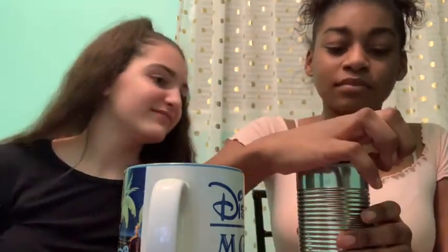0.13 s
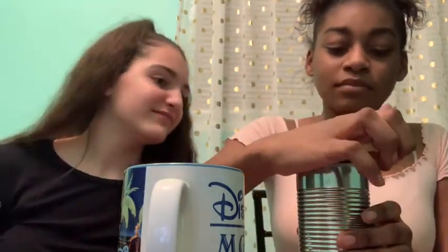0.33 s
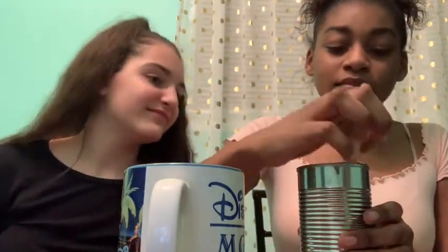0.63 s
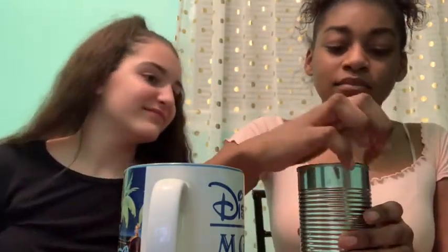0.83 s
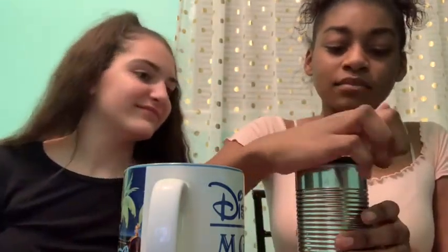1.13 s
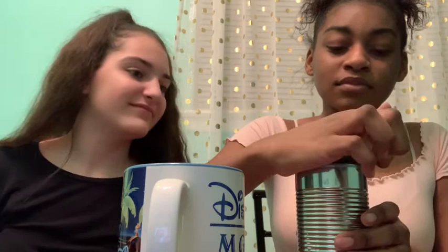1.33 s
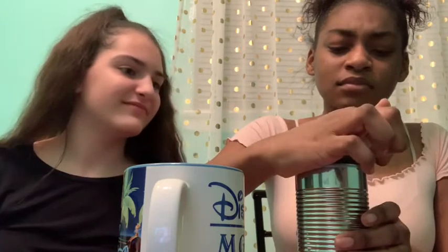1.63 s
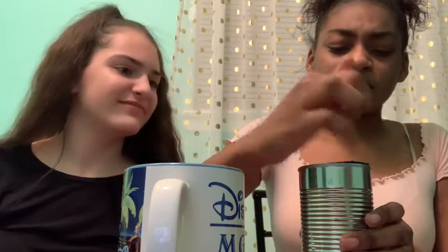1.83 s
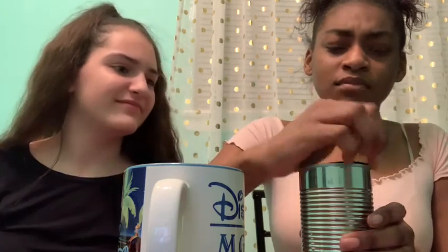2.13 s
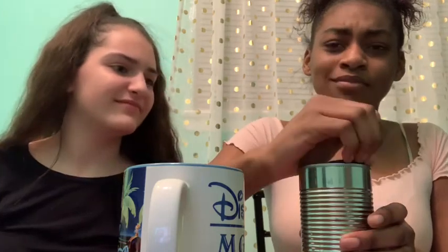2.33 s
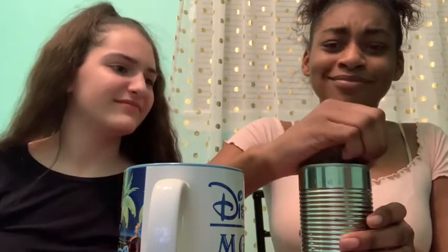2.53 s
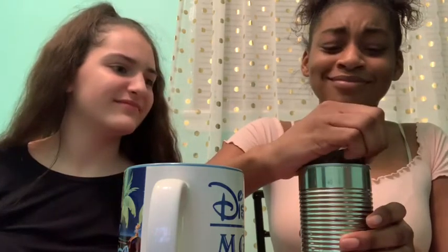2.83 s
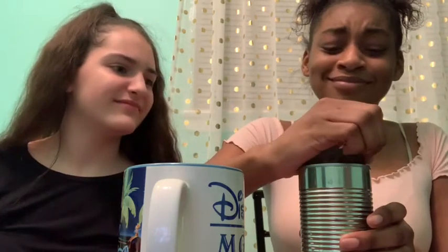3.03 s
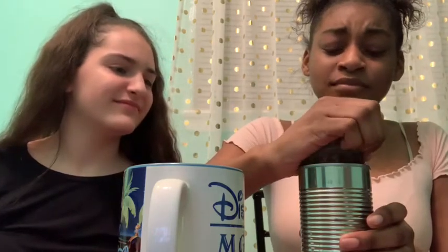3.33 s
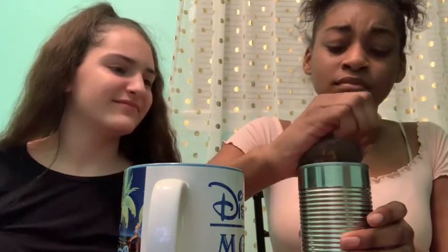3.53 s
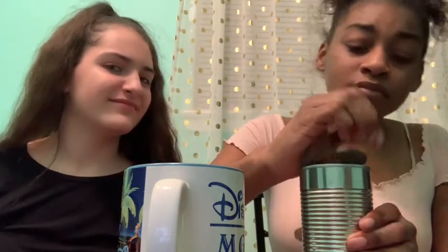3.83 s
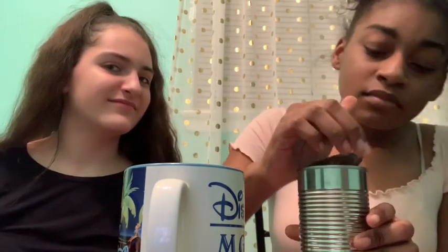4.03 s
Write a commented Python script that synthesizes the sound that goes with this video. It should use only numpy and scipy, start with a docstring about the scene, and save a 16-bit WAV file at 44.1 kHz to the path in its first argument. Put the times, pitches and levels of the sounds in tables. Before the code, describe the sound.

In a quiet small room, two hard metallic snaps, faint fingernail ticks, and finally a hollow pop with a short tearing rim and small bumps.

```python
"""A pull ring on a steel can is levered up and snaps twice against the lid; nails tick and scrape,
then the lid gives with a hollow pop and its rim tears while the can bumps on the table, in a quiet small room.
Snaps pass through a flexing lid into a ringing wall; knocks and chinks are damped modes; scrapes, rubs and
tears are runs of tiny slips or cracks. Two microphones hear it, the can a little to their right."""
import sys
import numpy as np
from scipy import signal
from scipy.fft import rfft, irfft, next_fast_len
from scipy.io import wavfile

SR = 44100
rng = np.random.default_rng(int(sys.argv[2]) if len(sys.argv) > 2 else 0)


def put_to_file(sound):
    """Save the sound as 16-bit audio at rate SR, in the file named by the first command-line argument."""
    columns = np.atleast_2d(sound).T  # one column per channel
    safe = np.clip(columns, -1, 1)
    whole_steps = np.round(safe * 32767)
    wavfile.write(sys.argv[1], SR, whole_steps.astype(np.int16))


N = 184029

# The quiet room's spectrum, its overall level set by HUSH_DB. Each row: frequency in Hz, relative density in dB.
HUSH_SPECTRUM = [(15, -34.5), (25, 3), (62, -6.5), (86, -19.5), (107, -13), (173, -14), (331, -24),
                 (445, -26.5), (614, -30.5), (1620, -37), (2170, -41.5), (8130, -44.5), (11200, -47),
                 (12500, -48.5), (15500, -49.5)]
HUSH_DB = -65.5  # rms of the two channels' average

# The ring snaps on the lid, which is stiffer once the ring is raised. Each row: start in seconds, level in dB,
# tilt in dB per octave, the lid's main flex in Hz, its lift in dB, pitch factor on the other lid modes,
# lag of the ring's rebound in seconds.
RING_SNAPS = [(0.4005, 7.5, -1.32, 1990, 0, 0.96, 0.0032), (1.7513, 11, -0.38, 2270, 5, 0.94, 0.0022)]
# Colour of the ring's contact. Each row: frequency in Hz, level in dB.
SNAP_COLOUR = [(40, -15), (230, -5), (550, -9), (800, -10.5), (1100, -12.5), (1650, -3.5), (2100, 1),
               (2500, 0), (2950, -3.5), (3500, -3.5), (4600, -12.5), (5800, -15.5), (7400, -19.5),
               (9000, -20.5), (11400, -25), (13000, -19), (15000, -20)]
# The lid's other quickly damped modes, at pitch factor 1. Each row: frequency in Hz, lift in dB, t60 in seconds.
LID_MODES = [(580, -2.5, 0.025), (850, -4.5, 0.018), (1490, -4, 0.017), (1790, -2, 0.012),
             (2768, -2, 0.015), (3220, -2, 0.012), (3540, -3, 0.006), (4110, -1, 0.013), (4880, -1, 0.0057),
             (6380, 4, 0.0073), (9500, -1.5, 0.0056), (14500, 3.5, 0.012)]
# The ribbed steel wall's clusters of close modes. Each row: centre in Hz, spread to either side in Hz,
# lift in dB, t60 in seconds.
WALL_CLUSTERS = [(1475, 90, -8.5, 0.4), (1750, 140, -8, 0.26), (2047, 160, -9, 0.23), (2317, 150, -9, 0.19),
                 (2753, 190, -9, 0.2), (3160, 130, -8.5, 0.22), (3624, 280, -7, 0.3),
                 (6200, 250, -10, 0.14), (7800, 23, -8.5, 0.27), (14900, 250, -4, 0.11)]
FLEX_T60_S = 0.007  # the lid's main flex dies quickly
GRIND_S, GRIND_DB = 0.009, -9  # the ring grinds before it lets go; level against the snap
REBOUND_DB = -11.5  # against the first contact

# Colour of the can's push on the table, before its pitch shift. Each row: frequency in Hz, level in dB.
THUD_COLOUR = [(20, -15), (40, -6), (60, -7.5), (95, -10.5), (135, 0.5), (190, 0.5), (270, -5.5),
               (420, -19), (800, -15), (3000, -62)]
# The table top's modes. Each row: frequency in Hz, relative level in dB, t60 in seconds.
TABLE_MODES = [(37, -5.5, 0.33), (70, -7.5, 0.14), (117.7, 3.5, 0.14), (144, 4.5, 0.02), (208.5, -1, 0.25),
               (255, 0.5, 0.16), (338, 0, 0.017)]
THUD_LAG_S = 0.0043  # the table takes each snap's push a little later

# Fingernail and ring ticks. Each row: start in seconds, level in dB, tilt in dB per octave,
# chink of the loose ring in dB.
NAIL_TICKS = [(0.805, -34, -5, -59), (1.067, -36, -6, -53), (1.081, -41, -8, -55), (1.091, -46, -6, -57),
              (2.238, -32.5, -0.5, -40.5), (2.249, -20.5, -2, -43), (2.284, -30.5, -6.5, -48),
              (2.389, -46, -6, -58), (2.481, -32.5, 2, -58), (2.49, -26, -0.5, -51), (2.505, -27, -2, -50),
              (2.578, -22.5, 0, -53), (3.075, -35.5, -3.5, -49.5), (3.096, -41.5, -3.5, -53.5),
              (3.131, -40.5, -3.5, -58), (3.506, -42.5, -3.5, -59), (3.807, -8.5, -5, -48),
              (3.811, -8, -3.5, -48), (3.8331, -12.5, -0.5, -28), (4.082, -26.5, 2, -25),
              (4.103, -22.5, -1, -30)]
# Strokes of the hand; each scrapes the steel and shifts the can. Each row: start in seconds, length in seconds,
# scrape drive in dB rms, scrape tilt in dB per octave, central pitch of the rubbed steel in Hz,
# rub drive in dB rms, central pitch of the rubbed body in Hz.
HAND_STROKES = [(0.995, 0.053, -86, 3, 2440, -72, 710), (1.061, 0.039, -68, -6.5, 2090, -76.5, 330),
                (2.173, 0.11, -75, -6, 2300, -70, 392), (2.237, 0.11, -65, 4, 1726, -62.5, 528),
                (2.319, 0.057, -71, -5, 1730, -66, 542), (2.478, 0.046, -61, 1.5, 2900, -60.5, 538),
                (2.573, 0.039, -71, -6.5, 1910, -50.5, 250), (2.662, 0.1, -73.5, -12.5, 1750, -76, 820),
                (3.795, 0.026, -60, -4, 2390, -56, 790), (3.833, 0.092, -81, 0, 2400, -46.5, 270),
                (3.946, 0.045, -73, -11, 3550, -58, 850), (4.067, 0.066, -59.5, 2, 3090, -52.5, 540)]
# Colour of the nails' contact. Each row: frequency in Hz, level in dB.
NAIL_COLOUR = [(100, 8.5), (600, -6), (1150, -13.5), (1800, 7), (2400, 8), (3200, 2), (4800, -11.5),
               (6200, -13.5), (9500, -14.5), (12500, -18), (14500, -20), (15800, -30)]
# The pull ring's chink. Each row: frequency in Hz, relative level in dB, t60 in seconds.
RING_MODES = [(1730, -7.5, 0.13), (2350, -6, 0.11), (2430, 4.5, 0.13), (2900, -3, 0.079), (3125, 4, 0.066),
              (3140, 2.5, 0.073), (3330, 1, 0.08), (3690, -6, 0.08)]
# Colour of the can shifting under the hand. Each row: frequency in Hz, level in dB.
RUB_COLOUR = [(30, 9.5), (95, -9), (150, 0), (240, 4.5), (380, -7), (550, -6), (900, -17.5), (1300, -24.5),
              (2500, -46), (8000, -51)]
CLUMP_S = 0.011  # slips and cracks bunch together over about this time

# Hollow knocks of lid and can. Each row: start in seconds, body level in dB, tilt in dB per octave,
# pitch factor on the body modes, drive of table and base in dB.
CAN_KNOCKS = [(1.077, -46, -7, 0.59, -37.5), (1.8083, -0.5, -2.5, 0.97, -2.5), (2.249, -30, -5, 0.8, -36.5),
              (2.266, -32, -8, 0.67, -30.5), (2.284, -35.5, 2, 0.77, -36), (2.389, -37.5, -4.5, 0.83, -37),
              (2.579, -23.5, -1, 0.97, -24.5), (2.593, -32, -5.5, 1.23, -20),
              (3.155, -50, -5.5, 0.77, -39.5), (3.811, -2, 0, 1.0, -23), (3.8174, -4, -4, 0.98, -5),
              (3.994, -31, -3, 0.8, -19.5), (4.083, -19, -7, 1.49, -45), (4.109, -17.5, -2, 0.71, -28.5)]
# The can's hollow body, at pitch factor 1. Each row: frequency in Hz, relative level in dB, t60 in seconds.
BODY_MODES = [(409, 0.5, 0.015), (614, 2, 0.032), (833.4, 2, 0.032), (1262, 4, 0.012), (1720, -22.5, 0.065),
              (1924, -10, 0.027)]
# The can's base knocking on the table. Each row: frequency in Hz, relative level in dB, t60 in seconds.
BASE_MODES = [(165.6, -1.5, 0.22), (254.7, 2, 0.11), (295, -8.5, 0.036)]
# Once the lid has given, the can rocks in evenly spaced bumps: the body's knock fades, the thud drive stays.
ROCK_START_S, ROCK_GAP_S = 3.862, 0.024
ROCK_DB, ROCK_FADE_DB = -34, -1.5  # first bump, change per bump
ROCK_TILT, ROCK_THUD_DB = -4, -31.5  # dB per octave, dB

# The lid tears along its scored rim. Each row: start in seconds, length in seconds, drive in dB rms,
# tilt in dB per octave.
RIM_TEARS = [(3.798, 0.03, -46, 0.5), (3.836, 0.12, -60, 0), (3.935, 0.088, -50.5, 0)]
# Colour of the tearing. Each row: frequency in Hz, level in dB.
TEAR_COLOUR = [(100, -9), (250, 6), (450, -4.5), (1000, 2), (1400, -9.5), (2000, -7.5), (3000, -14.5),
               (4500, -20), (6000, -30), (7300, -38), (9000, -30), (11000, -43), (15500, -45)]
# Colour of a sliver of rim parting. Each row: frequency in Hz, level in dB.
PART_COLOUR = [(1000, -12), (6000, 3.5), (10000, -23), (13000, 5), (15500, -1)]
PART_S, PART_DB, PART_T60_S = 3.8335, -24, 0.017  # start, level, decay of the parting sliver

# How long the room rings. Each row: frequency in Hz, t60 in seconds.
ROOM_T60 = [(60, 0.76), (130, -0.04), (250, 0.22), (700, 0.25), (2000, 0.31), (4000, 0.2743),
            (8000, 0.2251), (15000, 0.13)]
# The room tail's balance, before each source's wet level. Each row: frequency in Hz, level in dB.
ROOM_LEVEL = [(50, 9.5), (130, 1.5), (260, 5), (600, -1), (1100, 1), (2100, -6), (3500, -3.5), (6000, 1),
              (9000, 3), (15000, -2.5)]
# Likeness of the two channels in a diffuse field. Each row: frequency in Hz, coherence from 0 to 1.
CHANNEL_LIKENESS = [(50, 0.92), (150, 0.97), (380, 1), (700, 0.65), (1300, 0.077), (16000, 0.023)]
# Echoes of near walls. Each row: left delay in seconds, right delay in seconds, level in dB before the wet level.
WALL_ECHOES = [(0.0085, 0.0108, -21), (0.0143, 0.011, -24.5)]
# The left microphone's level against the right. Each row: frequency in Hz, level in dB.
LEFT_LEVEL = [(100, 0.44), (450, -1), (1200, -1.5), (2200, -0.5), (4000, -2), (8500, 3.5), (14000, 0)]
LEFT_LAG_S = 0.00022  # the direct sound reaches the left microphone later
EDGE_HZ = 15900  # the recorder's band limit


def amp(db):
    """Decibels to gain."""
    return 10 ** (np.asarray(db) / 20)


def unit(x):
    """Scales a sound to energy 1."""
    return x / np.sqrt(np.sum(x ** 2) + 1e-20)


def read(points, hz):
    """Reads a table on a log-frequency axis."""
    f, value = np.transpose(points)
    return np.interp(np.log(hz + 1), np.log(f + 1), value)


def add(mix, s, sound):
    """Mixes a sound in at time s."""
    part = mix[round(s * SR):][:len(sound)]
    part += sound[:len(part)]


def causal(colour, tilt=0, size=2048):
    """A minimum-phase pulse: the most compact causal one with a given spectrum, tilted in dB per octave."""
    hz = abs(np.fft.fftfreq(size, 1 / SR))
    tilt_db = tilt * np.log2(np.maximum(hz, 300) / 1000)  # the tilt stops below 300 Hz
    log_gain = np.log(amp(read(colour, hz) + tilt_db))
    return np.fft.ifft(np.exp(np.conj(signal.hilbert(log_gain)))).real


def click(colour, tilt=0, factor=1):
    """One contact of energy 1, its spectrum shifted in pitch by a factor."""
    return unit(causal([(hz * factor, db) for hz, db in colour], tilt))


def ring(modes, factor=1, tilt=0):
    """Damped sines of a struck object, energy 1; neighbouring modes swing opposite ways."""
    t = np.arange(SR // 2) / SR
    out = np.zeros(len(t))
    for k, (hz, db, t60) in enumerate(modes):
        decay = amp(db + tilt * np.log2(hz) - 60 * t / t60)
        out += (-1) ** k * decay * np.sin(2 * np.pi * hz * factor * t)
    return unit(out)


def resonance(t, db, t60):
    """Decay of a mode, scaled so that its resonance alone peaks at a gain of db."""
    return amp(db - 60 * t / t60) * 2 * np.log(1000) / (t60 * SR)


def lift(modes):
    """The response of a steel sheet that passes a blow on and rings with it at its modes."""
    t = np.arange(SR // 8) / SR
    response = sum(resonance(t, db, t60) * np.cos(2 * np.pi * hz * t) for hz, db, t60 in modes)
    response[0] += 1
    return response


def wall(wall_db=0, count=11):
    """The ribbed wall passes a blow on and shimmers in clusters of close modes, drawn afresh at each call."""
    t = np.arange(SR // 2) / SR
    response = np.zeros(len(t))
    response[0] = 1
    for hz, spread_hz, db, t60 in WALL_CLUSTERS:
        place, phase = rng.random((2, count, 1))
        position = 2 * (np.arange(count)[:, None] + place) / count - 1  # -1 to 1 across the cluster
        modes_hz = hz + spread_hz * position
        shimmer = np.cos(2 * np.pi * (modes_hz * t + phase)).sum(0)
        response += resonance(t, db + wall_db, t60) * shimmer
    return response


def bend(x, travel_s):
    """Bending waves in a sheet run faster when higher: a blow arrives treble first (travel time at 1 kHz)."""
    size = next_fast_len(len(x) + 2048)
    khz = np.fft.rfftfreq(size, 1 / SR) / 1000
    turns = 2 * 1000 * travel_s * np.sqrt(khz)  # phase in cycles
    return irfft(rfft(x, size) * np.exp(-2j * np.pi * turns), size)[:len(x)]


def slip_run(length, slips_per_s, spread_db, swell, clump_db):
    """Uneven slips that come in clumps, swell and fade (rms 1), and the place 0-1 where each one falls."""
    chance, size, sign, place = rng.random((round(length * SR), 4)).T
    grip = np.interp(np.arange(len(chance)) / (CLUMP_S * SR), np.arange(128), rng.uniform(-1, 1, 128))
    size_db = spread_db * np.minimum(-np.log(size), np.pi) + clump_db * grip
    slips = (chance < slips_per_s / SR) * amp(size_db) * np.sign(sign - .5)
    return unit(slips * signal.windows.tukey(len(slips), swell)) * np.sqrt(len(slips)), place


def friction(strokes, colour, slips_per_s, spread_db, swell, clump_db, ring_db, t60, wander_octaves, count=9):
    """Each stroke is a run of slips; each slip rings one of several spots of different pitch."""
    out = np.zeros(N)
    for s, length, db, tilt, hz in strokes:
        slips, place = slip_run(length, slips_per_s, spread_db, swell, clump_db)
        for k, octaves in enumerate(np.linspace(-wander_octaves, wander_octaves, count)):
            slip = amp(ring_db) * ring([(hz * 2 ** octaves, 0, t60)])
            add(slip, 0, click(colour, tilt))
            slips_here = slips * (np.floor(place * count) == k)
            add(out, s, amp(db) * signal.fftconvolve(slips_here, slip))
    return out


def pair(hz, z):
    """Makes two unrelated spectra as alike as a diffuse field is at the two microphones."""
    alike = np.clip(read(CHANNEL_LIKENESS, hz), -1, 1)
    mid = z[0] * np.sqrt((1 + alike) / 2)
    side = z[1] * np.sqrt((1 - alike) / 2)
    return np.array([mid + side, mid - side])


def hush():
    """The quiet room's steady rumble and hiss: shaped noise, alike in both channels only where a field would be."""
    hz = np.fft.rfftfreq(N, 1 / SR)
    noise = pair(hz, rfft(rng.standard_normal((2, N))))
    air = irfft(noise * amp(read(HUSH_SPECTRUM, hz)), N)
    return amp(HUSH_DB) * air / air.mean(0).std()


def snaps(travel_s=0.003):
    """The sprung ring grinds, slaps and rebounds; each crack passes through the flexing lid into the wall."""
    out = np.zeros(N)
    for s, db, tilt, flex_hz, flex_db, factor, rebound_s in RING_SNAPS:
        lid = [(flex_hz, flex_db, FLEX_T60_S)] + [(hz * factor, lift_db, t60) for hz, lift_db, t60 in LID_MODES]
        steel = signal.fftconvolve(lift(lid), wall())
        crack = bend(unit(signal.fftconvolve(click(SNAP_COLOUR, tilt), steel)), travel_s)
        slips = rng.standard_normal(round(GRIND_S * SR))
        grind = unit(slips * np.linspace(0, 1, len(slips)) ** 2)
        add(out, s - GRIND_S, amp(db + GRIND_DB) * signal.fftconvolve(grind, crack))
        add(out, s, amp(db) * crack)
        add(out, s + rebound_s, amp(db + REBOUND_DB) * crack)
    return out


def thuds(push_db=-7, table_db=-9, factor=0.895, travel_s=0.0032):
    """The can, jolted by each snap, pushes on the table: a dull, falling thump and the board's low modes."""
    out = np.zeros(N)
    for s, db, *_ in RING_SNAPS:
        add(out, s + THUD_LAG_S, amp(db + push_db) * click(THUD_COLOUR, 0, factor))
        add(out, s + THUD_LAG_S, amp(db + table_db) * ring(TABLE_MODES))
    return bend(out, travel_s)


def nails(travel_s=0.0016, skid_t60=0.022, skid_rise_s=0.0034, tap_db=-7):
    """Nails tap and skid on the ring and the lid's edge; the ring chinks and the wall rings faintly."""
    scrapes = [(s, length, db, tilt, hz) for s, length, db, tilt, hz, _, _ in HAND_STROKES]
    out = friction(scrapes, NAIL_COLOUR, slips_per_s=880, spread_db=2.5, swell=0.58, clump_db=6.5,
                   ring_db=0.0, t60=0.03, wander_octaves=0.13)
    t = np.arange(1024) / SR
    skid_shape = np.minimum(t / skid_rise_s, 1) * amp(-60 * t / skid_t60)
    for s, db, tilt, _ in NAIL_TICKS:
        skid = unit(rng.standard_normal(len(t)) ** 3 * skid_shape)  # cubing makes the noise spiky
        skid[0] += amp(tap_db)
        add(out, s, amp(db) * signal.fftconvolve(skid, click(NAIL_COLOUR, tilt)))
    out = signal.fftconvolve(out, wall(wall_db=-19))[:N]
    for s, _, _, chink_db in NAIL_TICKS:
        add(out, s, amp(chink_db) * ring(RING_MODES))
    return bend(out, travel_s)


def rubs(tilt=1.5):
    """The can shifts under the hand with every stroke: slips make a dull rub in its body."""
    shifts = [(s, length, db, tilt, hz) for s, length, _, _, _, db, hz in HAND_STROKES]
    return friction(shifts, RUB_COLOUR, slips_per_s=910, spread_db=2.5, swell=0.42, clump_db=4.5,
                    ring_db=-4.5, t60=0.016, wander_octaves=0.28)


def knocks(travel_s=0.000998, table_db=-4, base_db=-1):
    """The lid buckles or the can bumps: its hollow body, its base and the table answer."""
    out = np.zeros(N)
    thud = amp(table_db) * ring(TABLE_MODES) + amp(base_db) * ring(BASE_MODES)
    for s, db, tilt, factor, thud_db in CAN_KNOCKS + rocking():
        add(out, s, amp(db) * bend(ring(BODY_MODES, factor, tilt), travel_s))
        add(out, s, amp(thud_db) * thud)
    return out


def rocking(count=3):
    """The bumps of the rocking can, in the columns of CAN_KNOCKS."""
    return [(ROCK_START_S + k * ROCK_GAP_S, ROCK_DB + k * ROCK_FADE_DB, ROCK_TILT, 1, ROCK_THUD_DB)
            for k in range(count)]


def tearing(cracks_per_s=2600, spread_db=3.5, swell=0.6, clump_db=2.5, travel_s=0.0014):
    """The scored rim tears in dense runs of tiny cracks through the lid; a sliver parts with a bright tick."""
    out = np.zeros(N)
    for s, length, db, tilt in RIM_TEARS:
        cracks, _ = slip_run(length, cracks_per_s, spread_db, swell, clump_db)
        crack = unit(signal.fftconvolve(click(TEAR_COLOUR, tilt), lift(LID_MODES)))
        add(out, s, amp(db) * signal.fftconvolve(cracks, crack))
    t = np.arange(2048) / SR
    burst = unit(rng.standard_normal(len(t)) * t * amp(-60 * t / PART_T60_S))
    add(out, PART_S, amp(PART_DB) * signal.fftconvolve(burst, click(PART_COLOUR)))
    return bend(out, travel_s)


def room(x, wet_db, build_s=0.0059):
    """The direct sound reaches the right microphone first; wall echoes and a diffuse tail follow."""
    noise = rng.standard_normal((2, SR * 3 // 4))
    hz, t, z = signal.stft(noise, SR, nperseg=512)
    t60 = read(ROOM_T60, hz)[:, None]
    even_energy = np.sqrt(2 * np.log(1000) / (t60 * SR))  # long and short decays carry equal energy
    fade = amp(read(ROOM_LEVEL, hz)[:, None] - 60 * t / t60) * even_energy
    tail = signal.istft(pair(hz[:, None], z) * fade, SR, nperseg=512)[1]
    build = np.minimum(np.arange(tail.shape[1]) / (build_s * SR), 1) ** 2
    paths = amp(wet_db) * tail * build
    paths[[0, 1], [round(LEFT_LAG_S * SR), 0]] += 1  # direct sound
    for left_s, right_s, db in WALL_ECHOES:
        paths[[0, 1], [round(left_s * SR), round(right_s * SR)]] += amp(db + wet_db)
    paths[0] = signal.fftconvolve(paths[0], causal(LEFT_LEVEL))[:paths.shape[1]]
    return signal.fftconvolve(x[None], paths, axes=1)[:, :N]


def scene():
    """All the sounds of the can, heard in the room."""
    steel = room(snaps(), wet_db=1.0) + room(nails(), wet_db=-4.0) + room(tearing(), wet_db=-2.0)
    wood_and_body = room(thuds(), wet_db=-6.5) + room(knocks() + rubs(), wet_db=-5.5)
    return hush() + steel + wood_and_body


def record(dry):
    """The microphones drop the deepest rumble; then the recorder's band limit cuts the top."""
    heard = signal.sosfilt(signal.butter(1, 15, "high", fs=SR, output="sos"), dry)
    band_limit = signal.firwin(511, EDGE_HZ, window=("kaiser", 9), fs=SR)
    return signal.oaconvolve(heard, band_limit[None], "same")


dry = scene()
out = record(dry)
put_to_file(out)
```